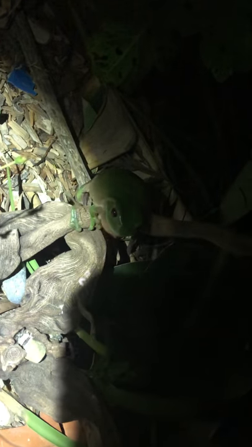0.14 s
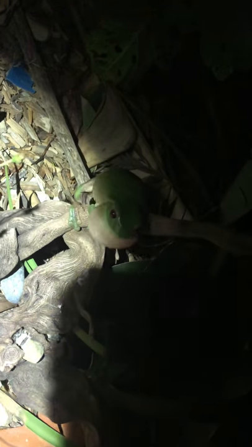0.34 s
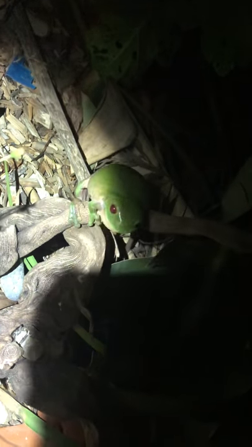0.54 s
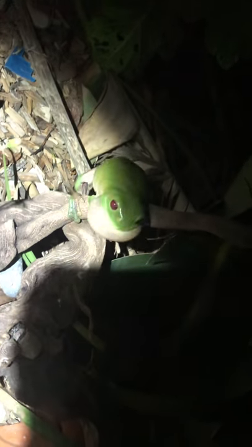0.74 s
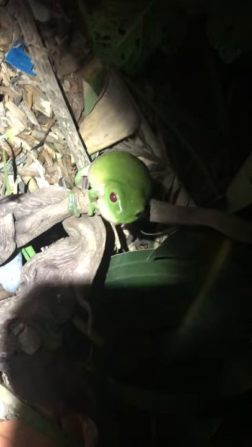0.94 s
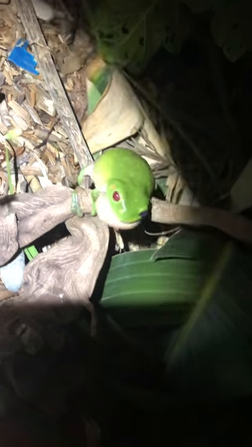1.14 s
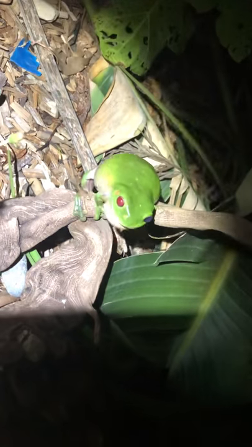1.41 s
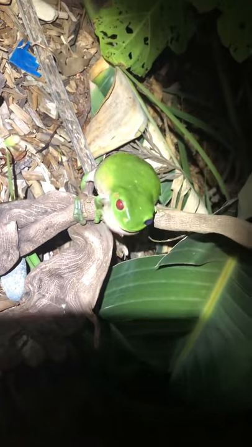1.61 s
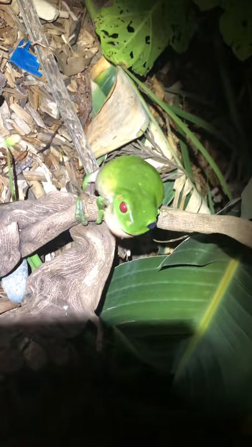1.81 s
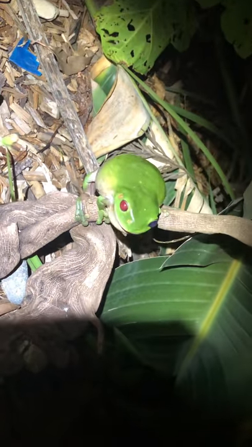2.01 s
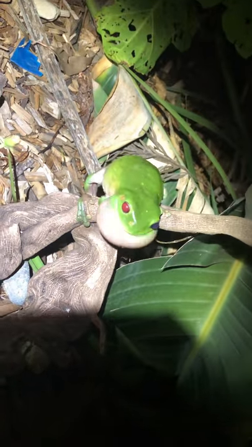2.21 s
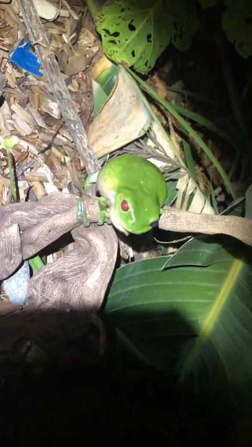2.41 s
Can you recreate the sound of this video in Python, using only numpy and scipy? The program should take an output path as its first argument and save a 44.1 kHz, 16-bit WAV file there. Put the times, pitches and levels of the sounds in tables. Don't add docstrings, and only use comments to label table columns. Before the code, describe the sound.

Loud, short, buzzy frog croaks close up, alternating with a quieter echoing frog in a still night garden

```python
import sys
import numpy as np
from scipy import signal
from scipy.fft import rfft, irfft, next_fast_len
from scipy.io import wavfile
from scipy.ndimage import uniform_filter1d, minimum_filter1d, map_coordinates

SR = 44100
rng = np.random.default_rng(int(sys.argv[2]) if len(sys.argv) > 2 else 0)


def boost(x):
    u = np.asarray(x, float) / 20
    return 10 ** u


def waveform_to_disk(signal):
    frames = np.transpose(np.atleast_2d(signal))
    scaled = np.clip(frames, -1, 1) * 32767
    samples = np.round(scaled).astype(np.int16)
    wavfile.write(sys.argv[1], SR, samples)


N = 112454


def unit(x):
    return x / np.sqrt(np.mean(x ** 2) + 1e-20)


def along(points, hz):
    f, v = np.transpose(points)
    return np.interp(np.log(hz + 1), np.log(f + 1), v)


def filtered(x, response):
    m = next_fast_len(N + SR // 2)
    spectrum = rfft(x, m) * response(np.fft.rfftfreq(m, 1 / SR))
    return irfft(spectrum, m)[..., :N]


def wobble(rate):
    return map_coordinates(rng.standard_normal(300), [np.arange(N) * rate / SR])


def add(out, s, x):
    i = round(s * SR)
    part = x[max(-i, 0):max(N - i, 0)]
    out[max(i, 0):][:len(part)] += part


def night():
    # frequency in Hz, density in dB per Hz
    night_tilt = [(20, -25), (60, -6.5), (100, -3), (250, -15.5), (700, -19), (2200, -37.5), (6000, -39),
                  (16000, -49)]
    # centre in Hz, width in Hz, level in dB, swells per second
    chorus = [
        (1060, 160, -59, 9),
        (1670, 70, -62, 6),
        (3050, 200, -77, 7),
        (6780, 220, -79, 25),
    ]
    rumble = unit(filtered(rng.standard_normal(N), lambda f: boost(along(night_tilt, f))))
    out = boost(-57.5 + wobble(6.5)) * rumble
    for centre_hz, width_hz, db, rate in chorus:
        band = unit(filtered(rng.standard_normal(N), lambda f: np.exp(-((f - centre_hz) / width_hz) ** 2)))
        out += boost(db + 3.6 * wobble(rate)) * band
    return out


def leaves():
    # start in seconds, peak level in dB
    ticks = [
        (0.633, -46.5),
        (1.5944, -50.5),
        (2.025, -60),
        (2.4964, -53),
    ]
    out, t = np.zeros(N), np.arange(400) / SR
    for s, db in ticks:
        add(out, s, boost(db + 4.5 - 60 * t / 0.0054) * rng.standard_normal(len(t)))
    return filtered(out, lambda f: 1j * f / (1500 + 1j * f))


def garden(x):
    # frequency in Hz, time to fall 60 dB in seconds
    echo_t60 = [(200, 0.22), (400, 0.23), (1100, 0.29), (3000, 0.44), (5000, 0.11), (10000, 0.091)]
    hz, t, z = signal.stft(rng.standard_normal(SR // 2), SR, nperseg=256)
    fade = boost(-60 * t / along(echo_t60, hz)[:, None])
    tail = signal.istft(z * fade, SR, nperseg=256)[1]
    late = np.pad(x, (300, 0))
    return signal.fftconvolve(late, tail / np.linalg.norm(tail))[:N]


def pulses(beat, shape):
    lock, end, cord_hz, rate_hz, lag_ms = beat
    swell, db, held, flap_ms, flap_db = shape

    gap_s, first_gap_s, first_at_s = .0074, .0055, .052
    k = np.arange(16)
    back = .0084 + gap_s * k + .0003 * (k % 2)
    closer = first_at_s + (back - first_at_s) * first_gap_s / gap_s
    back = np.where(back > first_at_s, closer, back)
    back = back[back < swell]
    rows = [(lock - b, 1 - b / swell, db - 3.5 - 31.5 * (b / swell) ** 2.38, 1) for b in back]

    s, lag, long = lock, lag_ms / 1000, 0
    while s < end + .002:
        age = s - lock
        progress = age / (end - lock)
        rows.append((s, 1 + progress ** 1.84, db - 0.2 * long, long))
        cycle = (1 + .05 * progress ** 4) / cord_hz
        slack = .00125 * np.exp(-age / .04)
        lag += 1 / (rate_hz + 75 * age)
        long = lag >= 2.5 * cycle + slack
        gap = 3 * cycle + .3 * slack if long else 2 * cycle + slack
        if age >= held:
            gap = lag
        lag -= gap
        s += gap
    last_flap = (rows[-1][0] + flap_ms / 1000, 2, db + flap_db, 1)
    return rows + [last_flap]


def frog(beats, shapes, sac, snap_db):
    # frequency in Hz, density of the click in dB per Hz
    snap_tilt = [(100, -18), (1000, -4.5), (5000, 1), (6200, -32), (8000, -22), (12000, -24.5),
                 (15000, -13)]
    ring, click, sac = np.zeros(N), np.zeros(N), np.array(sac)
    modes = len(sac)
    t = np.arange(SR // 20) / SR
    rise = (1 - np.exp(-t / sac[:, 7:])) ** 2
    polarity = (-1.) ** np.arange(modes)[:, None]
    decay = boost(-60 * t / sac[:, 6:7]) * rise * polarity
    click_fall_db = -60 * t[:600] / 0.013
    for beat, shape in zip(beats, shapes):
        chance = rng.standard_normal((48, 2, 16))
        noise = rng.standard_normal((48, 600))
        for (s, stage, db, long), (a, b), hiss in zip(pulses(beat, shape), chance, noise):
            mix = np.clip(1 - abs(stage - np.arange(3)), 0, 1)
            hz = sac[:, :3] @ mix * (1 + .005 * a[:modes])
            s += .00012 * a[-2] * (1 + 2 * (stage < 1))
            high = hz > 1800
            dull_db = -1.5 * long
            mode_db = sac[:, 3:6] @ mix + 1.2 * b[:modes] * (.5 + high) + dull_db * high
            gain = boost(db + .6 * a[-1] + mode_db)
            add(ring, s - .0015, gain @ (decay * np.sin(2 * np.pi * hz[:, None] * t)))
            add(click, s - .0015, boost(db + snap_db + dull_db + 4.9 * b[-1] + click_fall_db) * hiss)
    ring = filtered(ring, lambda f: (1j * f / (247.6 + 1j * f)) ** 3)
    return ring + filtered(click, lambda f: boost(along(snap_tilt, f)))


def far_frog():
    # lock in seconds, end in seconds, cord in Hz, pulse rate in Hz, first lag in ms
    far_beats = [
        (-.06, .045, 372, 136, .3),
        (.375, .491, 380, 134, .1),
        (.85, .976, 380, 128, .4),
        (1.33, 1.44, 378, 134, .2),
        (1.79, 1.904, 374, 132, .5),
        (2.27, 2.366, 378, 136, .3),
    ]
    # swell in seconds, level in dB, locked for seconds, last flap after ms, flap in dB
    far_shapes = [
        (.08, -23.5, .2, 6.8, -5),
        (.08, -25, .2, 7.3, -5.5),
        (.08, -25, .2, 6.8, -10),
        (.08, -24.5, .2, 4.9, -3.5),
        (.08, -24, .2, 6, -3.5),
        (.08, -24, .2, 7.7, -3),
    ]
    # a mode's Hz at start, lock and end, dB at start, lock and end, 60 dB fall and rise in seconds
    far_sac = [(388, 386, 397.6, -6.5, -4, -6.5, 0.04, 0.00073),
               (525, 520, 515, -10.5, -6.5, -15.5, 0.026, 0.00093),
               (780, 820, 714, -15, -10.5, -16.5, .012, 0.00029),
               (970, 1171, 1136, -5.5, 4, 5, 0.018, 0.00084),
               (1390, 1450, 1490, -15.5, -13.5, -13, 0.0096, 0.0004),
               (1890, 1900, 1850, -16.5, -14.5, -17.5, 0.012, 0.00035),
               (2500, 2500, 2400, -18.5, -17.5, -19.5, 0.0094, 0.00019),
               (3370, 3210, 3050, -31.5, -17.5, -20.5, 0.023, 0.00023),
               (7900, 18000, 17000, -83.5, -51.5, -52.5, .03, .0006)]
    return frog(far_beats, far_shapes, far_sac, snap_db=-59.5)


def near_frog():
    # lock in seconds, end in seconds, cord in Hz, pulse rate in Hz, first lag in ms
    near_beats = [
        (.2461, .3484, 375.1, 144.2, .97),
        (.6720, .7961, 376.1, 140.0, 0),
        (1.1867, 1.3017, 379.5, 143.7, .05),
        (1.6876, 1.7533, 385, 152, .58),
        (2.1563, 2.2561, 365.3, 146, .93),
    ]
    # swell in seconds, level in dB, locked for seconds, last flap after ms, flap in dB
    near_shapes = [
        (0.077, 0.5, .2, 5.4, -8),
        (0.073, 0, .2, 10, -3),
        (0.086, 0, .2, 6.1, -19.5),
        (0.087, -0.5, .024, 5, -28),
        (0.09, 0.5, .2, 10, -2.5),
    ]
    # a mode's Hz at start, lock and end, dB at start, lock and end, 60 dB fall and rise in seconds
    near_sac = [(388, 406.5, 399.4, -3.5, -7, -8.5, 0.046, 0.00092),
                (526, 517, 489, -8.5, -15, -12.5, 0.018, 0.00017),
                (720, 775, 787, -2.5, -5.5, -7.5, 0.01, 0.00018),
                (910, 1154, 1144, 5, 4, 1, 0.0098, 0.00065),
                (1223, 1452, 1443, -16, 4, 3.5, 0.013, 0.00093),
                (2020, 2070, 2103, -31, -14, -20, 0.011, 0.00016),
                (3040, 2840, 2710, -30, -21.5, -21.5, 0.0066, 0.000067),
                (3600, 3887, 3650, -50.5, -16.5, -22, 0.021, 0.00047),
                (4150, 4340, 4545, -65, -31.5, -34, 0.022, 0.00017),
                (8200, 7750, 7700, -45, -47.5, -37, 0.027, 0.0001),
                (9200, 8700, 8900, -84.5, -56.5, -50.5, .03, .0006),
                (9400, 9500, 11000, -66, -51, -53.5, 0.015, .0002),
                (14300, 14200, 13900, -74.5, -51, -57.5, .01, .0002)]
    return frog(near_beats, near_shapes, near_sac, snap_db=-28)


def scene():
    far, near = far_frog(), near_frog()
    echoes = garden(boost(-27) * near + boost(-11) * far)
    return (night() + leaves() + echoes + far + near)[None]


def top_cut(x):
    return signal.sosfilt(signal.butter(12, 16360, fs=SR, output="sos"), x)


def record(dry):
    # frequency in Hz, gain in dB
    mic_curve = [(4600, 0), (6200, -2), (7400, 0.5)]
    x = filtered(dry, lambda f: boost(along(mic_curve, f)) * (f < 15950))
    width = int(0.0017 * SR) | 1
    need = np.minimum(1, 1 / (abs(x) + 1e-9))
    need = minimum_filter1d(need, 2 * width + 1)
    return top_cut(x * uniform_filter1d(need, width))


dry = scene()
out = record(dry)
waveform_to_disk(out)
```